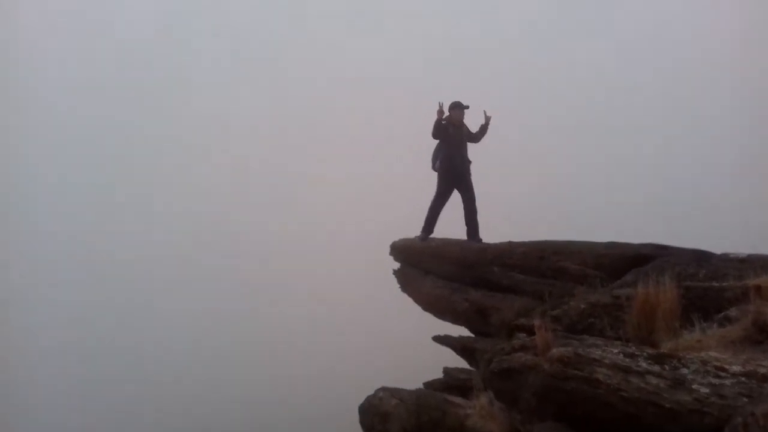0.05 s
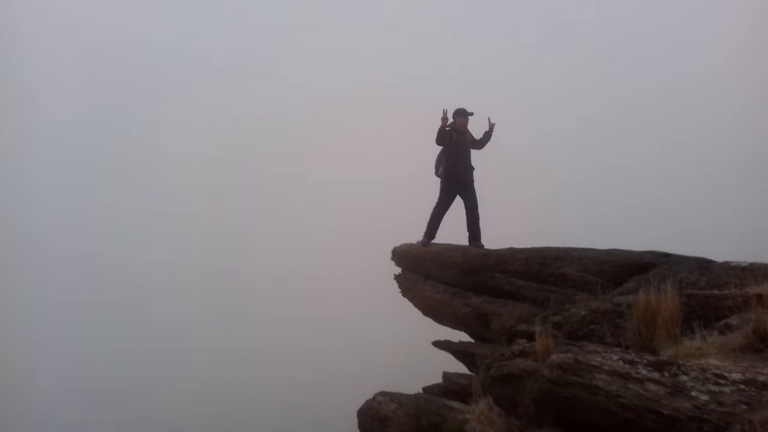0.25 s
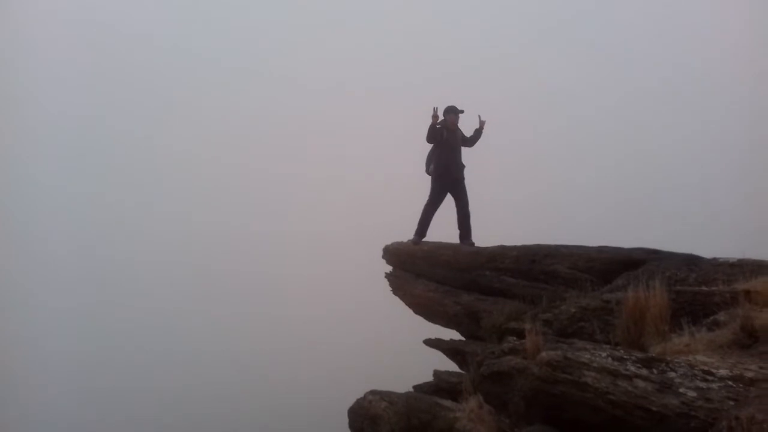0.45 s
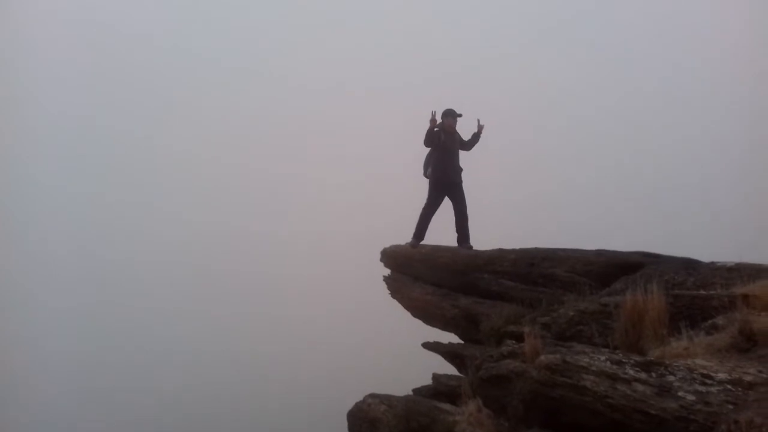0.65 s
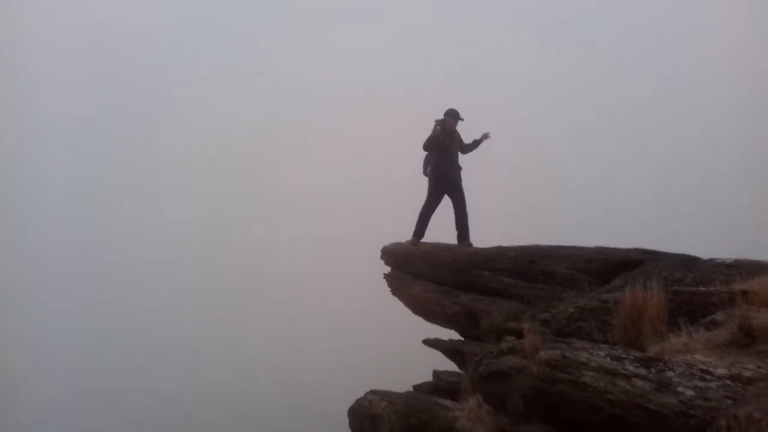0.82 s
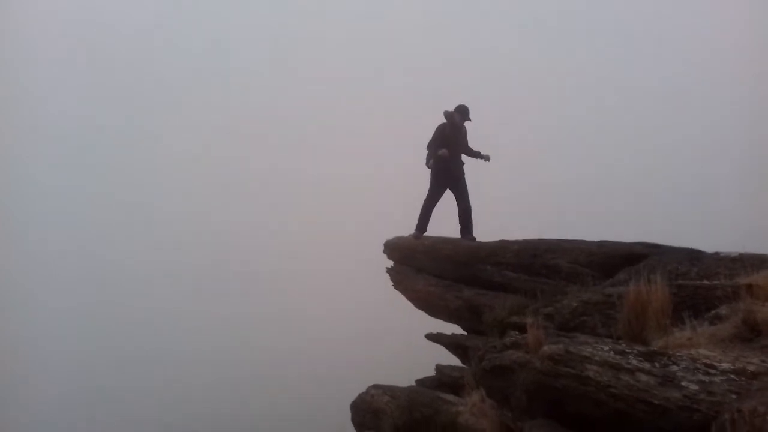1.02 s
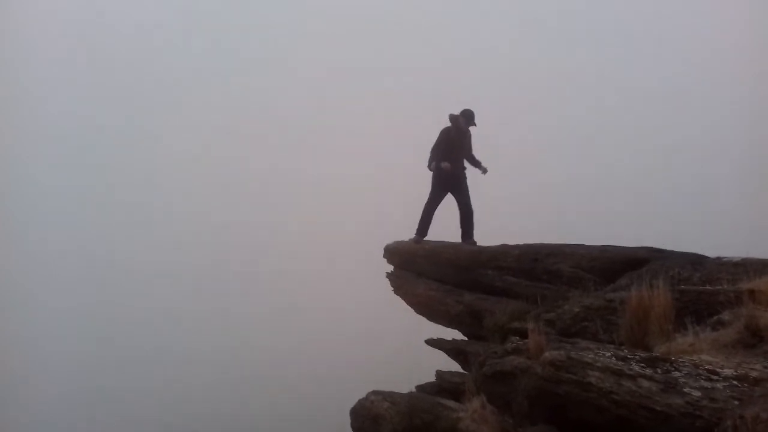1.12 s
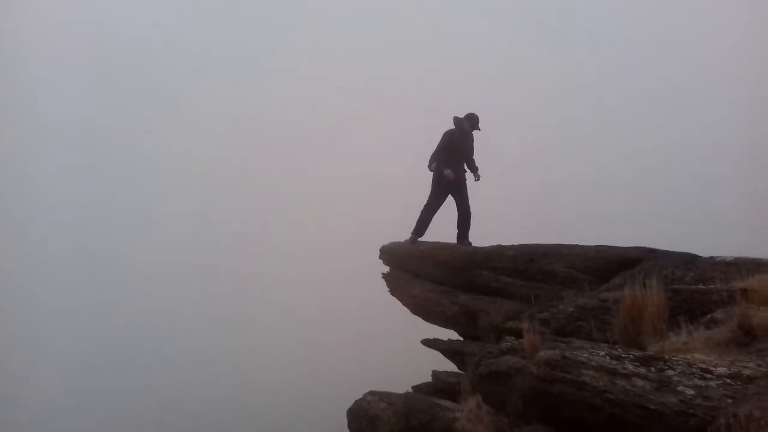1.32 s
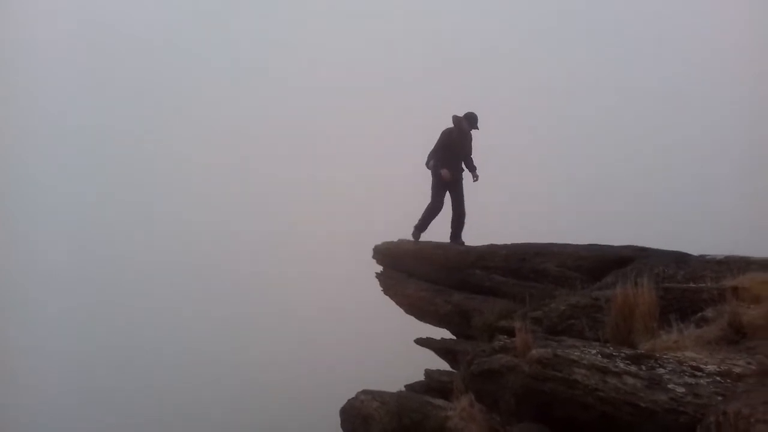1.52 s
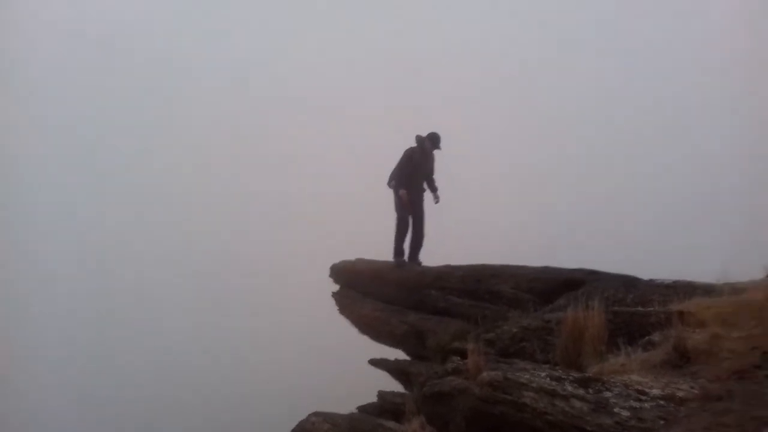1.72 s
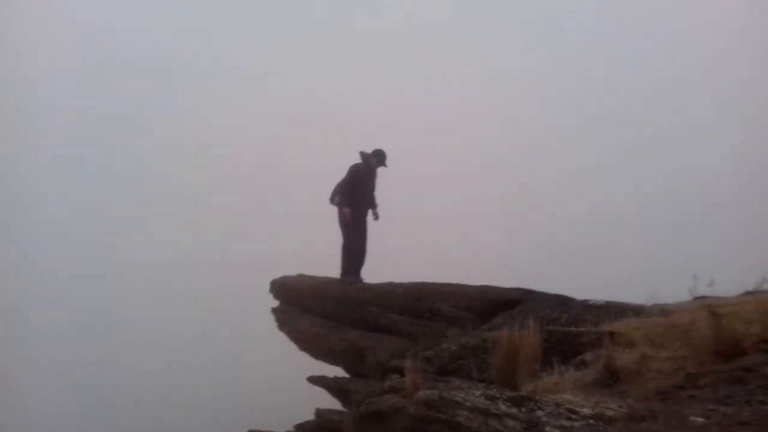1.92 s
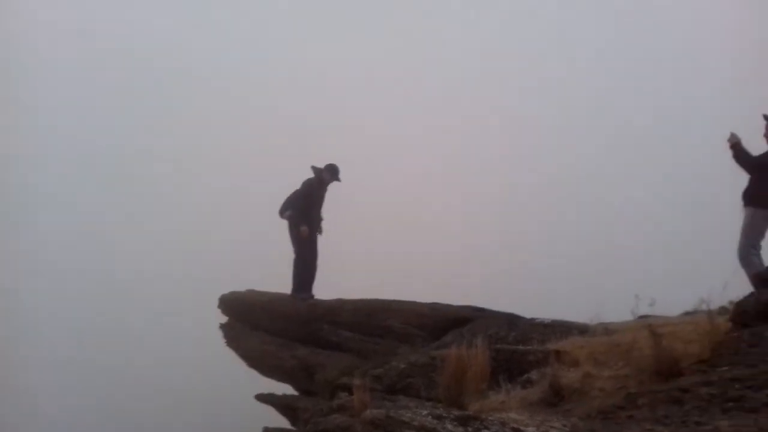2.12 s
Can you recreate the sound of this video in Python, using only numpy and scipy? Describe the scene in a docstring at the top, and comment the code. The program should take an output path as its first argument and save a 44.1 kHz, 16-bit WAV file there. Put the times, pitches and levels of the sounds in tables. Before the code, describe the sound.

Wind buffets a small microphone on an exposed mountain ledge. After a faint hiss, a gust hits at about 0.2 seconds with a low, fluttering rumble. It dips briefly near 0.5 seconds, with two barely audible rustles. The wind returns in rough, ripping bursts, peaking at 1.1 seconds and surging again near 1.4. After 1.5 seconds it eases into weaker, separate gusts.

```python
"""Gusts of wind buffet a small microphone on an exposed mountain ledge.
Faint air and hiss rise first. At 0.2 s a gust sweeps a fixed pattern of eddies across the port:
the harder the wind, the louder and quicker the pressure swings. Two faint rustles fall in a lull
near 0.5 s. The wind returns, brief buffets sharpening its rumble into a rip, and peaks at 1.1 s.
After 1.5 s it eases into weaker gusts. Throughout, a low-cut filter thins the bass."""
import sys
import numpy as np
from scipy import signal
from scipy.fft import rfft, irfft
from scipy.io import wavfile
from scipy.ndimage import uniform_filter1d, minimum_filter1d, map_coordinates

SR = 44100
rng = np.random.default_rng(int(sys.argv[2]) if len(sys.argv) > 2 else 0)


def digitize_waveform(pressure):
    """Quantize a signal to 16-bit integers and store it at the path in sys.argv[1].

    Rows of a 2-D input are taken as channels; values are limited to [-1, 1].
    """
    field = np.atleast_2d(pressure).T
    bounded = np.clip(field, -1, 1)
    quanta = np.round(bounded * 32767).astype(np.int16)
    wavfile.write(sys.argv[1], SR, quanta)


N = 94815

# pressure spectrum of the eddies at unit speed (frequency [Hz], relative density [dB])
EDDY_SPECTRUM = [(20, -6.5), (60, -3), (130, 2), (260, -2), (380, -6.5), (520, -15), (720, -23.5),
                 (1000, -36.5), (1400, -50.5), (2000, -70), (3000, -110)]
def wind(t):
    """Frozen turbulence: a fixed eddy pattern passes the port, so frequency scales with flow speed."""
    eddy_span_s, evenness = 0.014, 0.55
    level_db, speed = buffets(t, *gusts(t))
    eddies = noise(EDDY_SPECTRUM)
    local_power = smooth(eddies ** 2, eddy_span_s)
    eddies = eddies / local_power ** (evenness / 2)  # neighbouring eddies partly share their strength
    distance = np.cumsum(speed)
    return amp(level_db) * map_coordinates(eddies / eddies.std(), [distance], order=3, mode="mirror")


# strength of the wind at the port (time [s], level [dB])
GUST_LEVELS = [(0, -67), (.068, -68), (.08, -41), (.11, -51), (.125, -48.5), (.175, -49.5), (.195, -31),
               (.213, -29), (.228, -18), (.275, -25.5), (.32, -20.5), (.37, -23), (.405, -28), (.455, -34),
               (.48, -28), (.525, -34.5), (.555, -22), (.665, -22.5), (.735, -25), (.763, -19.5),
               (.822, -18.5), (.842, -27), (.875, -22.5), (.99, -21.5), (1.015, -29), (1.04, -19.5),
               (1.08, -23), (1.104, -10.5), (1.135, -19.5), (1.156, -12), (1.18, -18), (1.235, -18),
               (1.305, -25), (1.323, -18.5), (1.37, -25.5), (1.425, -14), (1.473, -15.5), (1.495, -20.5),
               (1.57, -25), (1.595, -30.5), (1.617, -26), (1.67, -36.5), (1.695, -28.5), (1.715, -39),
               (1.757, -48), (1.82, -28), (1.858, -28.5), (1.88, -40.5), (1.925, -27.5), (1.97, -41),
               (2.008, -43.5), (2.025, -28), (2.05, -31), (2.12, -28), (2.15, -40)]
def gusts(t):
    """Unsteady flow: relative speed follows a power law of pressure, and the two flutter together."""
    usual_db, speed_exponent = -23, .125
    calm_db, calm_slowing, calm_steepness = -26.5, .35, 7
    flutter_s, flutter_level_db, flutter_speed_db = .009, 2.24, 0.71
    level_db = smooth(np.interp(t, *np.array(GUST_LEVELS).T), .006)
    speed = amp(speed_exponent * (level_db - usual_db))
    # below the calm level the flow turns smooth and loses a share of its speed
    speed *= 1 - calm_slowing / (1 + amp(calm_steepness * (level_db - calm_db)))
    flutter = smooth(rng.standard_normal(N), flutter_s)
    flutter = 2 * np.tanh(flutter / flutter.std() / 2)  # held within two standard deviations
    return level_db + flutter_level_db * flutter, speed * amp(flutter_speed_db * flutter)


# quick jets of air (time [s], length [s], level change [dB], extra speed [fraction])
JETS = [(0.233, 0.006, 4.5, 0.17), (0.249, .009, 2, 0), (0.296, 0.013, -4, 0.35), (0.345, 0.0071, 5.5, 0.3),
        (0.37, 0.007, 5.5, 0.29), (0.583, .013, 0.5, .52), (0.633, 0.011, 1, 0.077),
        (0.69, 0.0091, 4.5, 0.23), (0.714, 0.013, 5, 0.68), (0.755, 0.011, 4, 0.11),
        (.801, 0.0074, 5, 0.37), (0.876, 0.0064, 3.5, 0.26), (0.999, 0.0043, 3, 0.23),
        (1.029, 0.0048, 4.5, 0.2), (1.046, 0.0079, 2, 0.33), (1.06, 0.0094, 2.5, 0.3),
        (1.095, 0.0061, 4.5, 0.56), (1.103, .005, 6.5, .5), (1.117, .012, 3, .43),
        (1.16, 0.0033, 7.5, 0.402), (1.191, .005, 8.5, .27), (1.239, 0.00465, 2.5, 0.465),
        (1.318, 0.0047, 5.5, 0.34), (1.344, .012, 2.5, 0.56), (1.42, 0.0064, 6.5, 0.933),
        (1.465, 0.0087, 1.5, .84), (1.514, 0.0038, -0.5, 0.65)]
def buffets(t, level_db, speed):
    """Time compression: a jet briefly shifts the level and hurries the eddies, brightening the rumble."""
    for at, length, change_db, extra_speed in JETS:
        pulse = bell(t, at, length)
        level_db = level_db + change_db * pulse
        speed = speed * (1 + extra_speed * pulse)
    return level_db, speed


# brushes in the first lull (time [s], length [s], level [dB])
BRUSHES = [(0.453, .008, -67.5), (0.516, 0.0252, -69)]
# spectrum of a brush (frequency [Hz], relative density [dB])
BRUSH_SPECTRUM = [(800, -25.5), (2200, -5.5), (2950, 11), (3900, -14), (8000, -29)]
def rustles(t):
    """Amplitude modulation: short swells of noise near 3 kHz make dry brushes, perhaps of clothing."""
    envelope = sum(amp(db) * bell(t, at, length) for at, length, db in BRUSHES)
    return noise(BRUSH_SPECTRUM) * envelope


# distant air and microphone hiss (frequency [Hz], relative density [dB])
AIR_SPECTRUM = [(30, -3), (300, 5.5), (700, -1.5), (1300, -4), (2000, -8.5), (3200, -13), (4500, -18.5),
                (6500, -22.5), (10000, -24), (15500, -23.5)]
def air(t):
    """Noise floor: a faint broadband hiss rises and then holds."""
    steady_db, rise_db, rise_s = -60, 5, 0.45
    return noise(AIR_SPECTRUM) * amp(steady_db - rise_db * np.maximum(1 - t / rise_s, 0))


def noise(spectrum):
    """Spectral shaping: white noise weighted by a spectrum, then scaled to unit rms."""
    hz, db = np.array(spectrum).T
    bin_hz = np.maximum(np.fft.rfftfreq(N, 1 / SR), 1)
    gain = amp(np.interp(np.log(bin_hz), np.log(hz), db))
    shaped = irfft(rfft(rng.standard_normal(N)) * gain, N)
    return shaped / shaped.std()


def smooth(x, seconds):
    """Repeated averaging: three running means approximate a Gaussian window."""
    size = max(int(seconds * SR / 2), 1)
    for _ in range(3):
        x = uniform_filter1d(x, size)
    return x


def bell(t, at, length):
    """Gaussian pulse: peak 1, with a length of two standard deviations."""
    return np.exp(-2 * ((t - at) / length) ** 2)


def amp(db):
    """Decibel law: amplitude grows tenfold every 20 dB."""
    return 10 ** (np.asarray(db) / 20)


def scene():
    """Superposition: wind, rustles and background add in one channel."""
    t = np.arange(N) / SR
    return (wind(t) + air(t) + rustles(t))[None]


def limit(x):
    """Peak limiting: the gain dips smoothly around any swing above the ceiling."""
    ceiling, dip_s = .89, .012
    gain = ceiling / np.maximum(np.abs(x), ceiling)
    held_gain = minimum_filter1d(gain, int(2 * dip_s * SR))
    return x * smooth(held_gain, dip_s)


def record(dry):
    """Band limiting: a high-pass thins the bass before the limiter; a low-pass then cuts the top."""
    low_cut_hz, top_hz = 90.7, 15750
    high_pass = signal.butter(2, low_cut_hz, "high", fs=SR, output="sos")
    low_pass = signal.ellip(10, .2, 70, top_hz, fs=SR, output="sos")
    thinned = signal.sosfilt(high_pass, dry)
    return signal.sosfilt(low_pass, limit(thinned))


dry = scene()
out = record(dry)
digitize_waveform(out)
```